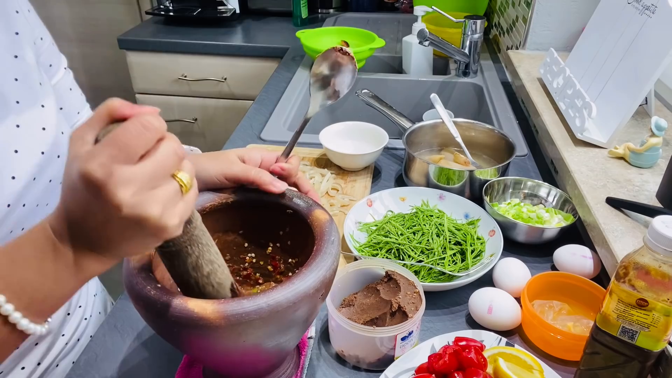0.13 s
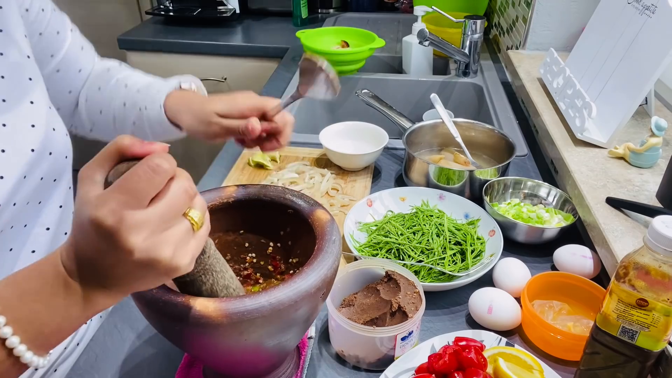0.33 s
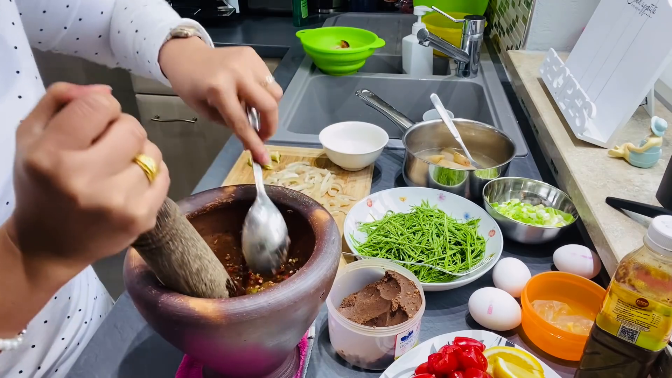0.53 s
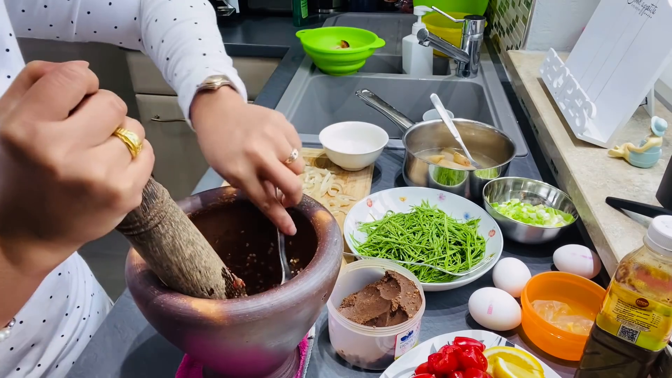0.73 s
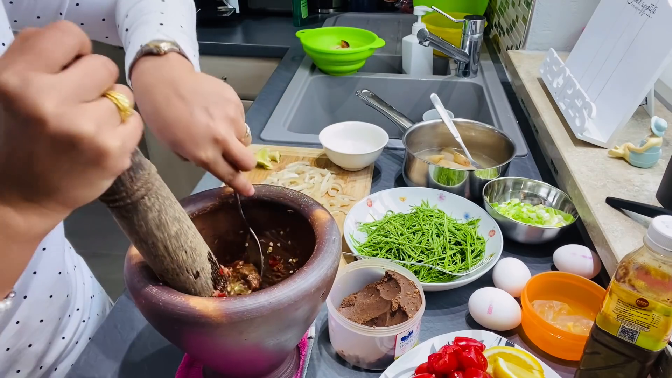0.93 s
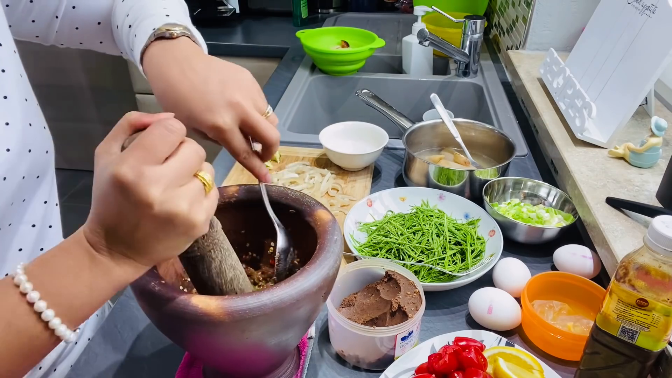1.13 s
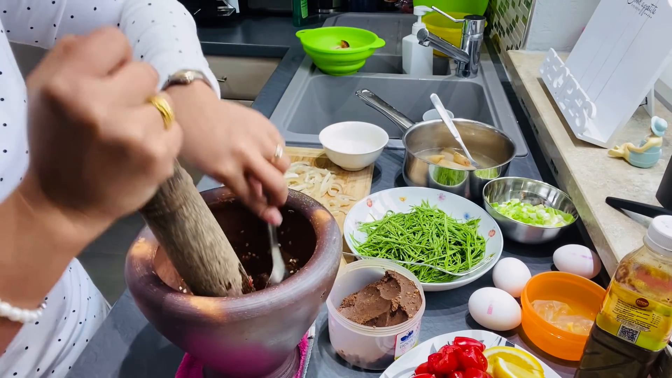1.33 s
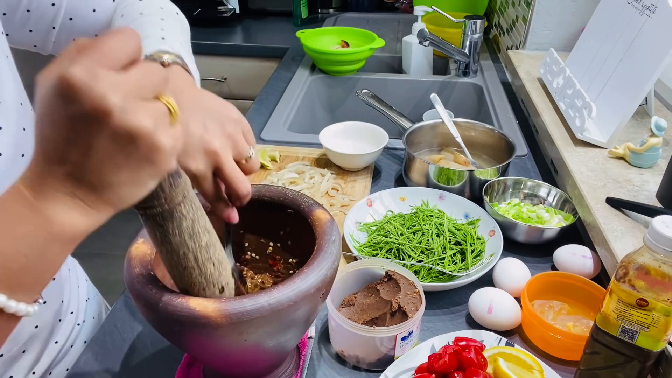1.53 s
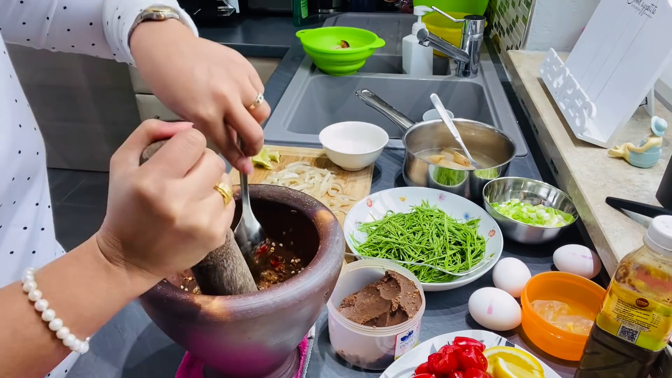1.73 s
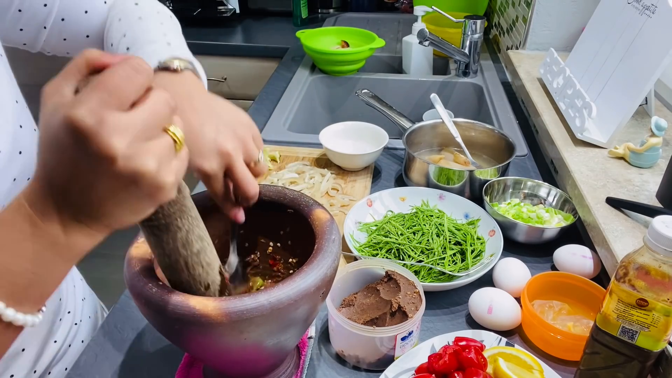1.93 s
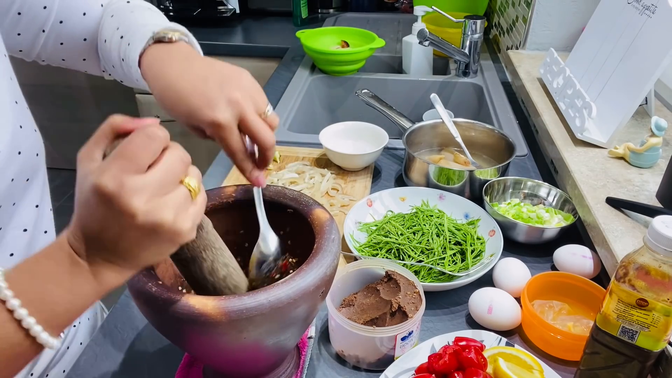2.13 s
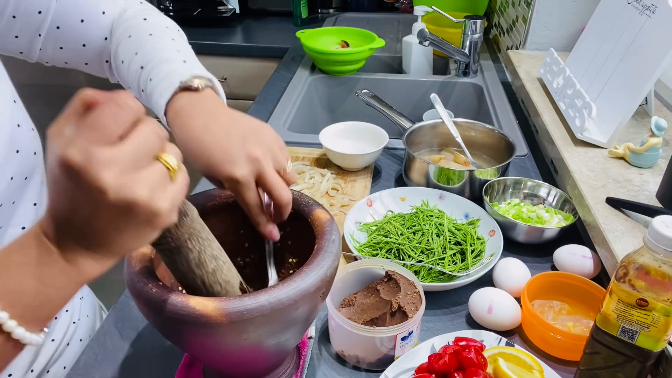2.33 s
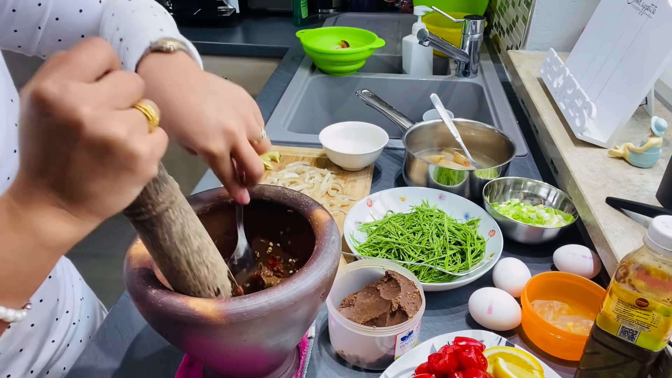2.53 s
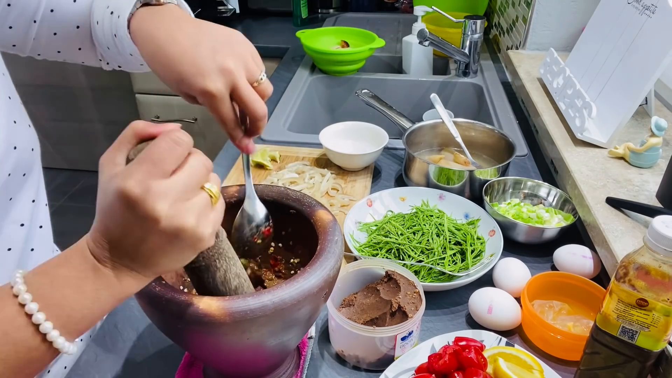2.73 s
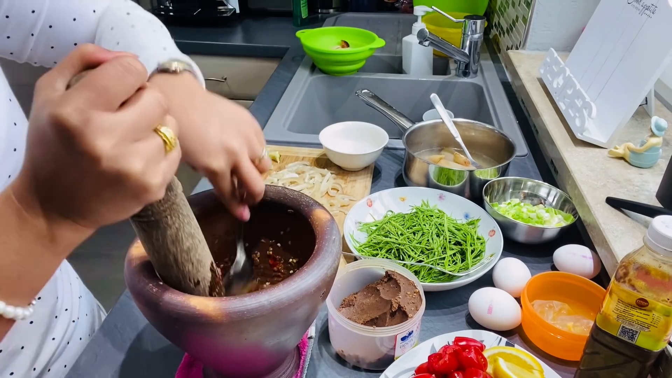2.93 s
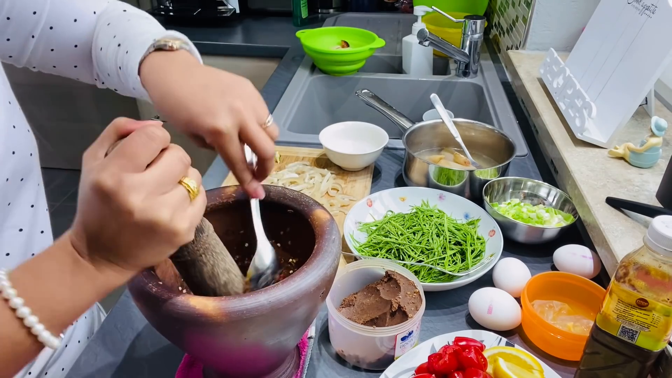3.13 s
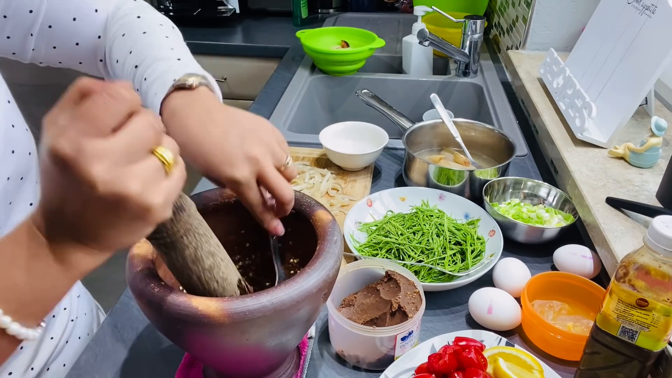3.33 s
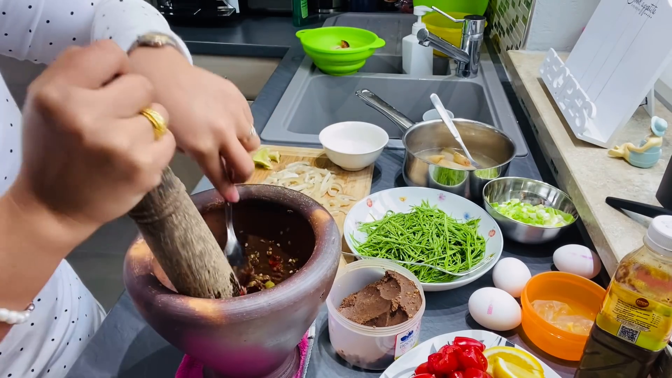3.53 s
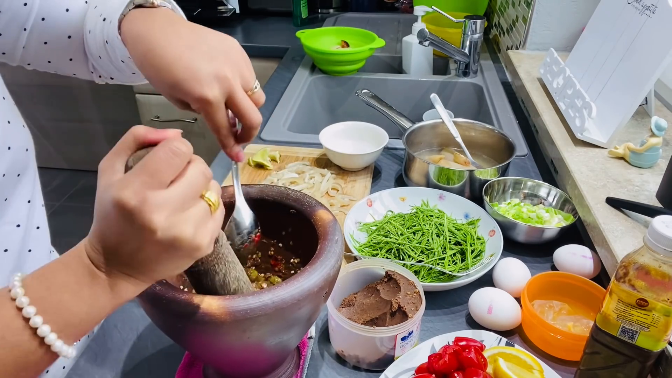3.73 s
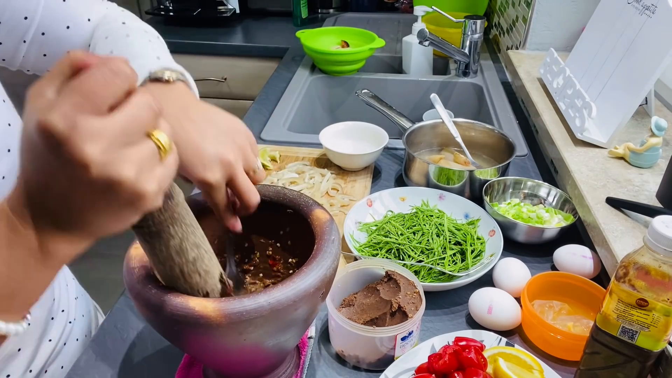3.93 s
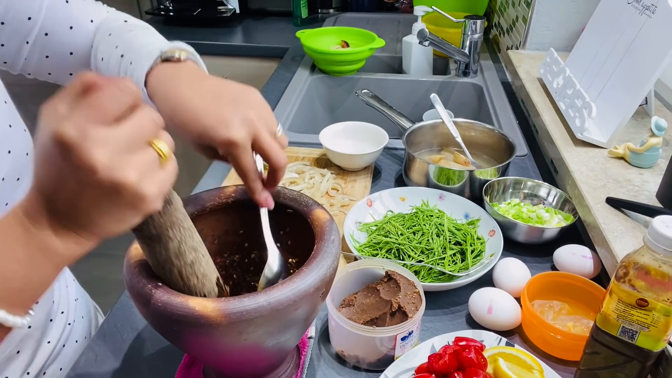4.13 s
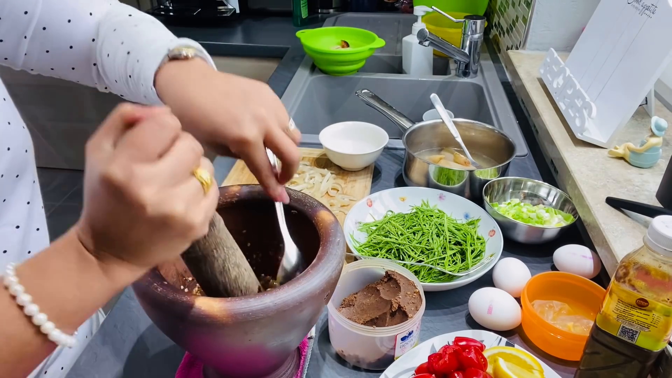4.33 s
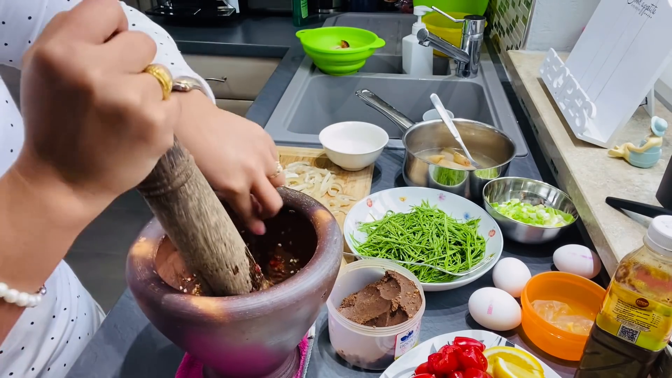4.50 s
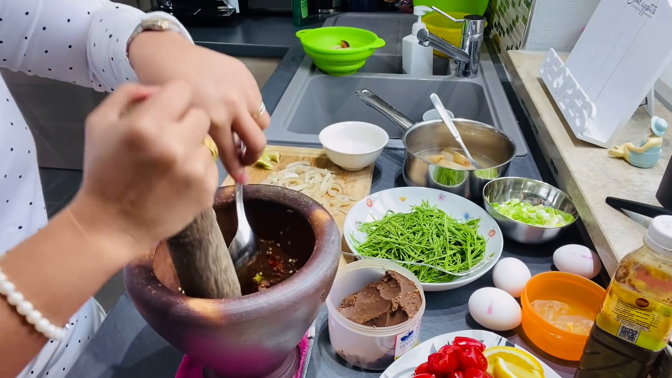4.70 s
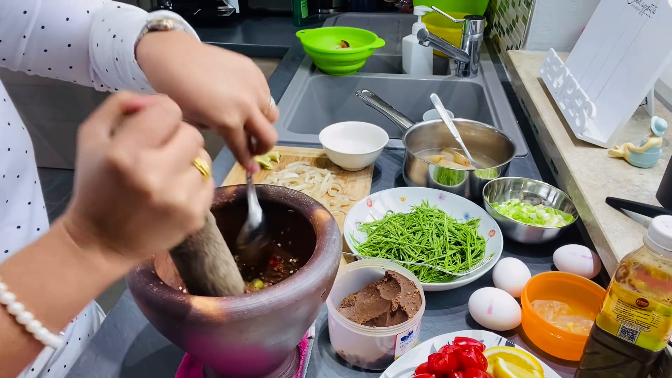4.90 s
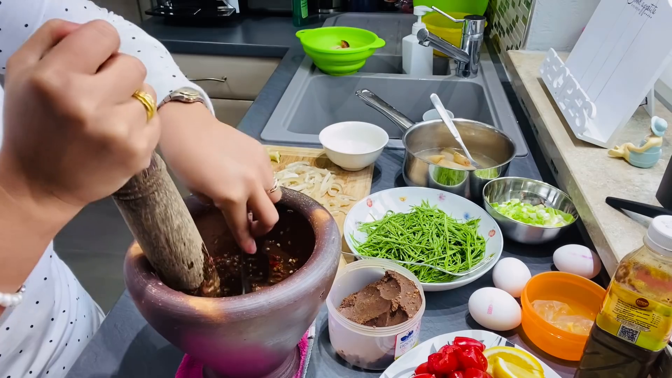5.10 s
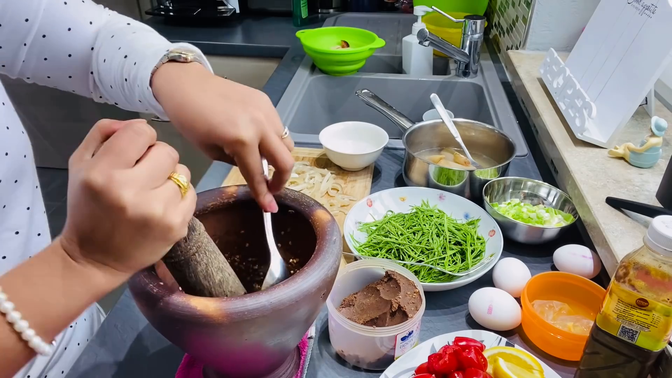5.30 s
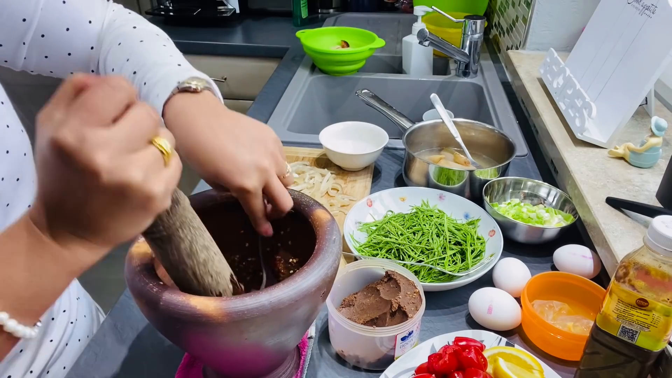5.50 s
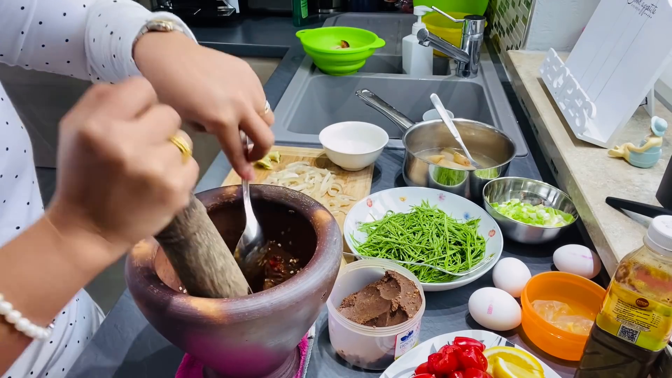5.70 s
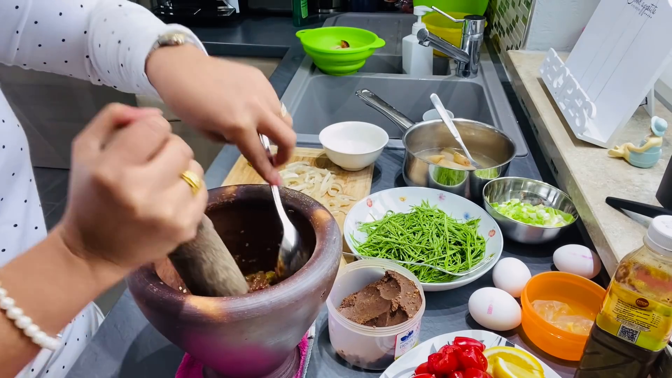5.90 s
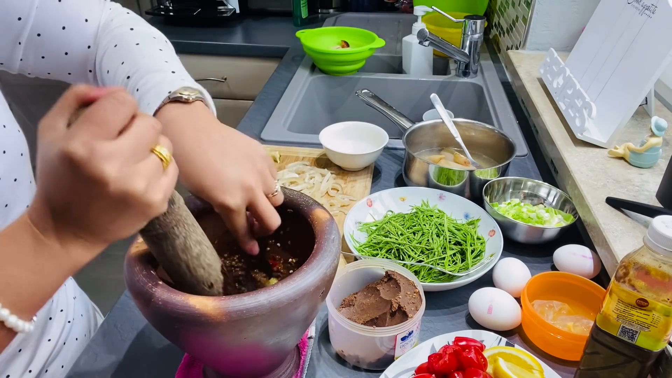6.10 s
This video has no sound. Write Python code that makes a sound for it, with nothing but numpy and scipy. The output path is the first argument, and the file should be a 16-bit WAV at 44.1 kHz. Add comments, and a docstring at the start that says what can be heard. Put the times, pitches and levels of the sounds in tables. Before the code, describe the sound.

A wooden pestle pounds wet chilli paste in a clay mortar, with dull, uneven thuds and a harder knock about once a second that briefly rings the bowl. Between knocks a steel spoon clinks and scrapes down the gritty wall. The paste crackles and squelches faintly, and each push makes the worktop rumble. The knocks lighten near the end. The microphone is close, in a small, hard kitchen.

```python
"""A low counter rumble under knocks and clinks: chilli paste is pounded in a clay mortar, close by.
Each push grinds seeds, parts wet films and rocks the worktop. The wooden pestle knocks the bowl,
whose wall rings; a steel spoon clinks on it and scrapes the paste down. The wet paste snaps faintly
and squelches in tiny bubbles, and a small hard kitchen answers."""
import sys
import numpy as np
from scipy import signal
from scipy.fft import rfft, irfft, next_fast_len
from scipy.io import wavfile
from scipy.ndimage import uniform_filter1d

SR = 44100
rng = np.random.default_rng(int(sys.argv[2]) if len(sys.argv) > 2 else 0)


def wav_record(signal):
    """Record a signal, one row per channel, as 16-bit PCM in the file named by sys.argv[1]."""
    frames = np.transpose(np.atleast_2d(signal))
    bounded = np.clip(frames, -1, 1)
    # unit amplitude maps onto the largest positive 16-bit level
    quanta = np.round(bounded * 32767).astype(np.int16)
    wavfile.write(sys.argv[1], SR, quanta)


N = 275757

# pestle leaning into the paste: peak_s, rise_s, sway_db, drum_db, drum_lead_s, grind_db, crackle_db
PUSHES = [(0.061, 0.036, -33.5, -41.5, 0, -42, -61.5), (1.11, 0.19, -32, -35.5, 0.018, -62, -56),
          (1.678, 0.15, -26.5, -36, .14, -39, -52), (2.102, 0.15, -26, -34, 0.031, -56, -44.5),
          (2.62, 0.12, -29, -31.5, 0.044, -47, -55), (3.12, .18, -27.5, -33.5, 0.032, -53, -63),
          (3.66, 0.28, -32.5, -34, 0.022, -33, -52), (4.201, 0.41, -40, -35.5, .01, -58.5, -52),
          (4.77, 0.21, -30.5, -35, 0.13, -44.5, -47), (5.28, 0.16, -29.5, -34.5, 0.093, -38, -71),
          (5.75, 0.087, -32, -39, 0.073, -88, -69), (6.15, 0.24, -31.5, -40, 0.051, -69, -54.5)]
# clay wall: pitch_hz, level_db, t60_ratio
WALL_MODES = [(1485, 1, 1), (1512, -22, .7), (1413, -18, .6), (2340, -23, .5), (3790, -27, .35)]
# steel spoon: pitch_hz, level_db, t60_s
SPOON_MODES = [(2225, -9.5, 0.071), (2491, 5.5, 0.012), (2888, -3, 0.042), (3015, -1, 0.023),
               (3480, 6, 0.011), (3740, -4.5, 0.039), (4234, 7.5, 0.008), (4930, -8, 0.014)]
# spectra of the bowl's hollow, steel rasping on clay and bright hiss: freq_hz, level_db
HOLLOW_SPECTRUM = [(150, -35), (290, -5.5), (400, -20), (490, -3), (575, 7.5), (660, 4), (790, 2),
                   (1050, -15.5), (1300, -8.5), (1490, -3), (1700, -23.5), (2200, -16.5), (3500, -57.5)]
RASP_SPECTRUM = [(600, -13), (1100, -8.5), (1400, -2.5), (1490, 5.5), (1700, -8.5), (1950, -3.5), (2230, 6),
                 (2550, -15.5), (2900, -5.5), (3600, -6.5), (4400, -2), (5300, -5), (6300, -17.5),
                 (8000, -26.5)]
HISS_SPECTRUM = [(3500, -36), (5500, 2.5), (6800, -1.5), (8600, 0.5), (9600, -1.5), (12500, -0.5),
                 (14300, -7), (16000, -61)]


def amp(db):
    """Decibels to gain."""
    return 10 ** (np.asarray(db) / 20)


def unit(x):
    """Scale to rms 1."""
    return x / np.sqrt(np.mean(x ** 2) + 1e-20)


def unit_hit(x):
    """Scale to rms 1 over the first 5 ms."""
    return x / np.sqrt(np.mean(x[:SR // 200] ** 2) + 1e-20)


def along(points, hz):
    """Interpolate (freq_hz, value) points on a log axis."""
    freq_hz, values = np.transpose(points)
    return np.interp(np.log(hz + 1), np.log(freq_hz + 1), values)


def add(track, start_s, sound):
    """Mix a sound into a track."""
    part = track[max(round(start_s * SR), 0):][:len(sound)]
    part += sound[:len(part)]


def filtered(x, response):
    """Apply a complex frequency response."""
    n = x.shape[-1]
    padded = next_fast_len(n + 8192)
    return irfft(rfft(x, padded) * response(np.fft.rfftfreq(padded, 1 / SR)), padded)[..., :n]


def coloured(x, spectrum):
    """Shape by a spectrum, at rms 1."""
    return unit(filtered(x, lambda hz: amp(along(spectrum, hz))))


def noise(spectrum, size=N):
    """Shaped Gaussian noise at rms 1."""
    return coloured(rng.standard_normal(size), spectrum)


def levelled(x, window):
    """Take the slow swells out of a narrow noise."""
    power = uniform_filter1d(np.abs(signal.hilbert(x)) ** 2, window) / 2
    return x / np.sqrt(np.abs(power) + 1e-4)


def decay(t, t60_s):
    """Gain falling 60 dB in t60_s."""
    return np.exp(-np.log(1000) * t / t60_s)


def swell(peak_s, rise_s, fall_s):
    """Gain that climbs 20 dB in rise_s, peaks at 1 and drops 20 dB in fall_s."""
    t = np.arange(N) / SR - peak_s
    return amp(-20 * np.maximum(-t / rise_s, t / fall_s))


def held(start_s, length_s, attack_s, release_s, slope_db=0):
    """Attack, a hold that changes by slope_db, and a release of 20 dB in release_s."""
    t = np.arange(N) / SR - start_s
    hold_db = slope_db * np.clip(t / length_s, 0, 1)
    release_db = 20 * np.maximum(t - length_s, 0) / release_s
    return np.clip(t / attack_s, 0, 1) * amp(hold_db - release_db)


def grains(per_s, spread_db):
    """Impulses of random time, sign and size."""
    happens = rng.random(N) < per_s / SR
    return happens * rng.choice([-1, 1], N) * amp(spread_db * np.minimum(rng.standard_normal(N), 2))


def ring(modes, t, scatter_db, detune):
    """Damped modes; each contact point gives new strengths and slightly new pitches."""
    hz, db, t60_s = np.transpose(modes)
    hz = hz * (1 + detune * rng.standard_normal(len(hz)))
    gains = amp(db + scatter_db * rng.standard_normal(len(hz))) * (-1) ** np.arange(len(hz))
    return gains @ (np.sin(2 * np.pi * hz[:, None] * t) * decay(t, t60_s[:, None]))


def counter(sway_hz=57.9, wander_hz=3.52, rumble_db=-17):
    """Each push rocks the mortar, which drives two low resonances of the worktop."""
    # upper resonance: freq_hz, level_db
    drum_spectrum = [(55, -53), (76, 2.5), (88, -5), (99, 4), (112, -5.5), (135, -14), (175, -28.5),
                     (300, -33), (900, -100)]
    sway, drum = amp(-50.5), amp(-55.5)  # the hands' weight between pushes
    for peak_s, rise_s, sway_db, drum_db, lead_s, *_ in PUSHES:
        sway = np.maximum(sway, amp(sway_db) * swell(peak_s, rise_s, fall_s=0.14))
        drum = np.maximum(drum, amp(drum_db) * swell(peak_s - lead_s, rise_s, fall_s=0.2))
    wander = noise([(8, 0), (30, -60), (100, -120)])  # an uneven push bends the pitch
    low = np.sqrt(2) * np.sin(2 * np.pi * np.cumsum(sway_hz + wander_hz * wander) / SR)
    low += amp(rumble_db) * noise([(18, -43), (38, -1), (70, 18.5), (130, -45), (300, -101)])
    high = levelled(noise(drum_spectrum), window=1800)
    return sway * low + amp(3) * drum * high


def paste(grind_lead_s=0.21, crackle_lead_s=0.052):
    """Seeds grind before each push is heaviest; wet films pop around it."""
    # popping films: freq_hz, level_db
    pop_spectrum = [(600, -34), (1400, 6.5), (2300, -2.5), (4000, -1), (6500, -6.5), (8600, -3.5),
                    (12500, -38), (16000, -31)]
    grind, crackle = np.zeros((2, N))
    for peak_s, *_, grind_db, crackle_db in PUSHES:
        grind += amp(grind_db) * swell(peak_s - grind_lead_s, rise_s=0.082, fall_s=0.34)
        crackle += amp(crackle_db) * swell(peak_s - crackle_lead_s, rise_s=0.35, fall_s=0.25)
    seeds = coloured(grains(per_s=730, spread_db=1), HOLLOW_SPECTRUM)
    pops = coloured(grains(per_s=2300, spread_db=14.5), pop_spectrum)
    return amp(-3) * (grind * seeds + crackle * pops)


def thump(t, contact_hz, lag_cycles=1.0973):
    """A short push through the clay; low bending waves arrive later than high ones."""
    # wood on clay: freq_hz, level_db
    knock_spectrum = [(100, -15.5), (200, -7), (320, -3), (550, 1.5), (900, 3.5), (1250, -4), (1650, 8),
                      (2000, -5.5), (2400, -12.5), (2750, -43), (3800, -11), (4600, -34), (9000, -66.5)]
    push = np.zeros(len(t))
    push[SR // 2000] = 1
    cushioned = lambda hz: amp(along(knock_spectrum, hz)) / np.sqrt(1 + (hz / contact_hz) ** 4)
    dispersion = lambda hz: np.exp(-2j * np.pi * lag_cycles * np.log(hz + 1))
    return unit_hit(filtered(push, lambda hz: cushioned(hz) * dispersion(hz)))


def hollow_note(t, start_hz=530, end_hz=650, glide_s=0.059, t60_s=0.23, attack_s=0.006):
    """The air in the bowl sounds briefly, rising in pitch as it fades."""
    hz = end_hz + (start_hz - end_hz) * np.exp(-t / glide_s)
    hz *= 1 + 0.0303 * rng.standard_normal()
    tone = np.sqrt(2) * np.sin(2 * np.pi * np.cumsum(hz) / SR)
    return tone * decay(t, t60_s) * (1 - np.exp(-t / attack_s))


def wall(t, t60_s, attack_s=0.0015):
    """The bell-like note of the clay wall."""
    modes = [(hz, db, ratio * t60_s) for hz, db, ratio in WALL_MODES]
    return unit_hit(ring(modes, t, scatter_db=1.5, detune=0.001)) * (1 - np.exp(-t / attack_s))


def pestle(base_contact_hz=2080, cushion_db_per_octave=6, free_t60_s=0.17, choke_db=-6.5):
    """Each knock thuds through the mortar, rings its wall and wakes the air inside."""
    # knocks: start_s, thud_db, wall_db, hollow_db
    knocks = [(0.027, -43, -73, -45), (0.354, -36, -59.5, -50), (0.905, -43.5, -72, -45.5),
              (1.028, -29.5, -46, -28), (1.3418, -18, -15.5, -33), (1.396, -28, -29, -21.5),
              (1.427, -30.5, -30.5, -62), (1.476, -29, -36, -45), (1.643, -37.5, -50, -41.5),
              (1.904, -45, -35.5, -30.5), (1.965, -27.5, -39.5, -38.5), (2.4832, -23, -29.5, -31.5),
              (2.534, -33.5, -44, -33.5), (2.79, -40.5, -26.5, -61), (2.899, -30.5, -56, -26),
              (2.961, -32, -33.5, -47.5), (3.324, -43.5, -39, -48.5), (3.38, -36.5, -43.5, -30.5),
              (3.443, -17, -16, -40), (3.495, -27, -34.5, -30), (3.876, -27.5, -31, -51),
              (3.912, -33, -49, -31.5), (4.12, -36.5, -51, -41), (4.198, -38.5, -77, -32),
              (4.468, -34, -43, -37.5), (4.5008, -16, -6, -41), (4.554, -19.5, -22, -35.5),
              (4.583, -31, -41.5, -36), (4.872, -40, -57.5, -37.5), (4.972, -28.5, -41.5, -27.5),
              (5.062, -33, -36.5, -27), (5.429, -38, -43, -36), (5.640, -32.5, -49, -32.5),
              (5.811, -34.5, -25, -59), (5.976, -31.5, -50.5, -53), (6.095, -41.5, -51.5, -34.5)]
    # mortar on its stand: pitch_hz, level_db, t60_s
    body_modes = [(270, -4.5, 0.36), (344, 1, 0.12), (486, -19, 0.047), (673, 5, 0.17), (765, -28, 0.081),
                  (914, -3.5, 0.15), (1204, -4.5, 0.11), (2300, 5, 0.02)]
    out, t = np.zeros(N), np.arange(SR // 3) / SR
    for start_s, thud_db, wall_db, hollow_db in knocks:
        # paste under the pestle dulls the thud as it mutes the ring
        contact_hz = base_contact_hz * 2 ** (min(wall_db - thud_db, 5) / cushion_db_per_octave)
        # a hard blow stays in contact: ring time halves at choke_db
        wall_t60_s = free_t60_s / (1 + amp(wall_db - choke_db) ** 2)
        body = unit_hit(ring(body_modes, t, scatter_db=2, detune=0.0036))
        thud = thump(t, contact_hz) + amp(-13) * body
        crunch = noise(HOLLOW_SPECTRUM, len(t)) * decay(t, t60_s=0.22)
        air = hollow_note(t) + amp(-8) * crunch
        knock = amp(thud_db) * thud + amp(wall_db) * wall(t, wall_t60_s) + amp(hollow_db - 2) * air
        add(out, start_s, knock)
    return out


def burst(t, spectrum, t60_s):
    """Decaying noise with a spike at its onset."""
    spike = amp(5) * decay(t, t60_s=0.0022)
    return unit_hit(noise(spectrum, len(t)) * (spike + decay(t, t60_s)))


def clinks_and_snaps(attack_s=0.00021):
    """Loud spoon clinks on clay and faint bright snaps of wet paste."""
    # clinks and snaps: start_s, level_db, bright_db
    clicks = [(0.027, -40, 13), (0.069, -38, 4), (0.3, -43.5, -4.5), (0.6146, -18.5, 2),
              (0.8594, -32.5, 2.5), (1.0002, -36, 4), (1.0289, -20.5, 4.5), (1.1521, -37, 3.5),
              (1.3946, -14.5, -44), (1.572, -35.5, 4.5), (1.6082, -31.5, 0), (1.752, -32, -0.5),
              (1.8045, -30.5, -7), (1.8618, -33.5, 1), (1.893, -23.5, -16), (1.9155, -28, -39),
              (1.9952, -32.5, 4.5), (2.2332, -35, -9.5), (2.2744, -39, 14), (2.3272, -13, -44),
              (2.5347, -33, 2), (2.5572, -43, 13.5), (2.6224, -34.5, -0.5), (2.7505, -25, -14),
              (2.7883, -23, -3.5), (2.8675, -12, -9.5), (2.8923, -28.5, -23), (3.0262, -36, 3),
              (3.0659, -29, -0.5), (3.1924, -41, 5), (3.2462, -24, 7.5), (3.3256, -15.5, -24),
              (3.3774, -32.5, 0), (3.5511, -31.5, 3), (3.6329, -32.5, 2), (3.7487, -35, -5),
              (3.8073, -18, -18.5), (3.8727, -22, -13), (4.12, -39.5, 3), (4.1481, -31, 3.5),
              (4.337, -38, -4), (4.362, -19.5, -26), (4.4667, -32, -15.5), (4.609, -30, 2),
              (4.7067, -33.5, 6), (4.8865, -19, -12), (4.9019, -9.5, -20.5), (5.0627, -30, 0),
              (5.0727, -41.5, -28), (5.1996, -40, 4.5), (5.2406, -33, 6), (5.4288, -27, -24.5),
              (5.6393, -34.5, 6), (5.7414, -40.5, 7), (5.8394, -31.5, -10), (5.9236, -26, -13),
              (5.9985, -23.5, -15), (6.0096, -25, -21)]
    out, t = np.zeros(N), np.arange(SR // 5) / SR
    for start_s, level_db, bright_db in clicks:
        crack = burst(t, RASP_SPECTRUM, t60_s=0.052)
        ping = unit_hit(ring(SPOON_MODES, t, scatter_db=5.5, detune=0.036))
        shelf = [(3300, 0.0019), (4200, 0.34 * bright_db + 2)]  # brightness lifts the upper modes
        clink = filtered(unit_hit(crack + ping), lambda hz: amp(along(shelf, hz)))
        tick = amp(bright_db) * burst(t, HISS_SPECTRUM, t60_s=0.027)
        click = amp(-6) * (clink + tick) + amp(-18) * wall(t, t60_s=0.03)
        add(out, start_s, amp(level_db) * click * (1 - np.exp(-t / attack_s)))
    return out


def singing_mode(centre_hz, width_hz):
    """One resonance driven by friction noise."""
    friction = rng.standard_normal(N)
    return unit(filtered(friction, lambda hz: 1 / (1 + ((hz - centre_hz) / width_hz) ** 2)))


def rubbed_wall():
    """Light friction keeps the wall's main and highest modes sounding."""
    # rubs along the wall: start_s, length_s, level_db
    rubs = [(0.358, 0.29, -42.5), (0.613, 0.054, -27), (0.83, 0.024, -39)]
    note = levelled(singing_mode(WALL_MODES[0][0], width_hz=16), window=2000)
    overtone = singing_mode(WALL_MODES[-1][0], width_hz=64)
    envelope = sum(amp(level_db - 5.5) * held(start_s, length_s, attack_s=0.038, release_s=0.052)
                   for start_s, length_s, level_db in rubs)
    return (note + amp(-22) * overtone) * envelope


def grip(catches_per_s, depth_db):
    """Gain of an edge that catches and lets go at random."""
    knots = np.clip(rng.standard_normal(N // 20), -2, 2)
    hold = np.interp(np.arange(N) * catches_per_s / SR, np.arange(len(knots)), knots)
    return unit(amp(depth_db * hold))


def spoon_scrapes(attack_s=0.0033, release_s=0.015, hollow_rise_db=13, rasp_rise_db=2, hiss_sag_db=6.5):
    """The spoon's edge slips over gritty clay, growing duller and hollower as it sinks into paste."""
    # strokes down the wall: start_s, length_s, hollow_db, rasp_db, hiss_db
    strokes = [(0.617, .14, -44.5, -38.5, -33), (0.816, 0.034, -42, -36.5, -32),
               (1.248, 0.082, -36, -33, -30.5), (1.893, 0.041, -28, -41, -35.5),
               (2.285, 0.068, -29, -31, -37.5), (2.858, 0.06, -24, -40, -41.5),
               (3.244, 0.14, -31.5, -34.5, -32.5), (3.798, 0.12, -31, -34, -44),
               (4.33, 0.1, -38, -35.5, -37.5), (4.898, 0.033, -41, -35, -42),
               (4.928, 0.069, -24, -27.5, -36), (5.922, .1, -41, -39.5, -34)]
    hollow_gain, rasp_gain, hiss_gain, steel = np.zeros((4, N))
    slips = unit(grains(per_s=2700, spread_db=6)) * grip(catches_per_s=160, depth_db=3.5)
    for start_s, length_s, hollow_db, rasp_db, hiss_db in strokes:
        stroke = lambda slope_db: held(start_s, length_s, attack_s, release_s, slope_db)
        bite = amp(rasp_db - rasp_rise_db) * stroke(rasp_rise_db)
        rasp_gain += bite
        hollow_gain += amp(hollow_db - hollow_rise_db) * stroke(hollow_rise_db)
        hiss_gain += amp(hiss_db) * stroke(-hiss_sag_db)
        span = slice(round(start_s * SR), round((start_s + length_s + 2 * release_s) * SR))
        # each grip shifts the spoon's modes
        modes = ring(SPOON_MODES, np.arange(SR // 10) / SR, scatter_db=5.5, detune=0.015)
        add(steel, start_s, signal.fftconvolve((slips * bite)[span], modes / np.linalg.norm(modes)))
    edge = (rasp_gain * coloured(slips, RASP_SPECTRUM) + steel) / np.sqrt(2)
    hollow = hollow_gain * coloured(slips, HOLLOW_SPECTRUM)
    hiss = hiss_gain * coloured(slips, HISS_SPECTRUM)
    return amp(-5) * (hollow + edge) + amp(-2) * hiss


def squelches(bubbles=36, typical_hz=1910, pitch_spread=0.2, spread_db=4, rise_s=0.0056, decay_cycles=6.8):
    """Air escapes through wet paste as tiny bubbles, each rising in pitch."""
    # paste squeezed from under the pestle: start_s, length_s, level_db
    squeezes = [(1.392, 0.042, -40), (1.924, 0.062, -39.5), (2.965, 0.072, -33.5), (3.87, 0.037, -35),
                (4.938, .06, -24.5), (5.965, 0.04, -47)]
    out, t = np.zeros(N), np.arange(SR // 40) / SR
    glide = 1 + 0.097 * (1 - np.exp(-t / rise_s))
    for start_s, length_s, level_db in squeezes:
        for when, (pitch, size) in zip(rng.random(bubbles), rng.standard_normal((bubbles, 2))):
            cycles = np.cumsum(typical_hz * np.exp(pitch_spread * pitch) * glide) / SR
            bubble = np.sin(2 * np.pi * cycles) * np.exp(-cycles / decay_cycles)
            add(out, start_s + length_s * when, amp(level_db + spread_db * (size - 1)) * bubble)
    return out


def near_echoes(x, t60_s=0.026, delay_s=0.0016):
    """Rim, worktop and dishes scatter each sound to the two microphone ports."""
    # echo strength: freq_hz, gain_db
    scatter = [(100, -15.5), (300, 0.5), (1500, 6.5), (4000, 5), (8000, -2)]
    out, t, block = np.zeros((2, N + SR)), np.arange(SR // 25) / SR, SR // 4
    envelope = decay(t, t60_s) * np.clip(t / delay_s - 1, 0, 1)
    for start in range(0, N, block):
        paths = rng.standard_normal((2, len(t))) * envelope
        wet = signal.fftconvolve(x[None, start:start + block], paths / np.linalg.norm(paths[0]), axes=1)
        out[:, start:start + wet.shape[1]] += wet
    return amp(-11) * filtered(out[:, :N], lambda hz: amp(along(scatter, hz)))


def diffuse(size):
    """Noise reaching the two ports from all sides."""
    # left-right likeness: freq_hz, coherence
    likeness = [(60, 0.93), (130, 0.43), (280, 0.22), (600, 0.16), (2000, 0.028), (5000, 0.067), (8000, 1),
                (13000, 1)]
    angle = lambda hz: np.arccos(np.clip(along(likeness, hz), -1, 1)) / 2
    split = lambda hz: np.array([np.cos(angle(hz)), np.sin(angle(hz))])
    mid, side = filtered(rng.standard_normal((2, size)), split)
    return np.array([mid + side, mid - side])


def kitchen(x, build_s=0.00067):
    """Tiles and cupboards reverberate; the paths change as the hands move."""
    # reverberation: freq_hz, t60_s
    room_t60 = [(100, 0.58), (500, 0.56), (1500, 0.42), (4000, 0.37), (9000, 0.29), (15000, 0.37)]
    out, block = np.zeros((2, N + SR)), SR // 2
    for start in range(0, N, block):
        hz, t, bands = signal.stft(diffuse(block), SR, nperseg=256)
        bands *= decay(t, along(room_t60, hz)[:, None]) * (1 - np.exp(-t / build_s))
        tail = signal.istft(bands, SR, nperseg=256)[1][:, :block]
        wet = signal.fftconvolve(x[None, start:start + block], tail / np.linalg.norm(tail[0]), axes=1)
        out[:, start:start + wet.shape[1]] += wet
    return out[:, :N]


def scene():
    """Knocks, clinks, snaps, friction and rumble in the kitchen, over its faint steady noise."""
    # room noise: freq_hz, level_db
    floor_spectrum = [(18, -45.5), (30, -29), (83, -1), (200, -20.5), (374, -20.5), (460, -10.5),
                      (859, -31), (8250, -45), (10400, -71.5), (13200, -57), (15000, -59)]
    knocks, clicks = pestle(), clinks_and_snaps()
    friction = spoon_scrapes() + paste() + squelches() + rubbed_wall()
    echoes = near_echoes(amp(-2.5) * knocks + clicks + friction)
    room = kitchen(amp(-4) * knocks + amp(-0.5) * clicks + amp(-3.5) * friction)
    direct = knocks + clicks + friction + counter()
    return direct + echoes + room + amp(-51.5) * coloured(diffuse(N), floor_spectrum)


def record(dry, top_hz=16400):
    """Two microphone ports differ in level and phase; the treble is uneven and band-limited."""
    # left minus right: freq_hz, level_db
    balance = [(60, -2), (250, -3), (550, -3), (1500, -2), (4000, -1.5), (8000, -0.5)]
    # left ahead of right: freq_hz, phase_rad
    phase_lead = [(200, 0), (1400, -.3), (3200, -.1), (5000, -1.2), (6000, -2), (8000, 0), (10500, 3.14),
                  (13000, 6.28), (15000, 8.3)]
    # microphone response: freq_hz, gain_db
    response = [(22, -13), (36, -2), (9300, -2), (10500, -11), (12000, -6), (15500, -6.5)]
    sides = np.array([[0.5], [-0.5]])
    ports = lambda hz: amp(sides * along(balance, hz)) * np.exp(1j * sides * along(phase_lead, hz))
    return filtered(dry, lambda hz: ports(hz) * amp(along(response, hz)) * (hz < top_hz))


dry = scene()
out = record(dry)
wav_record(out)
```